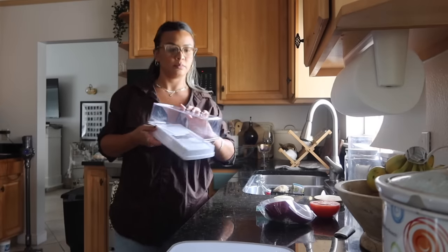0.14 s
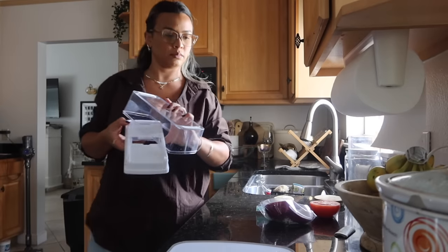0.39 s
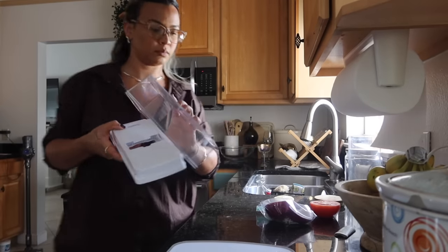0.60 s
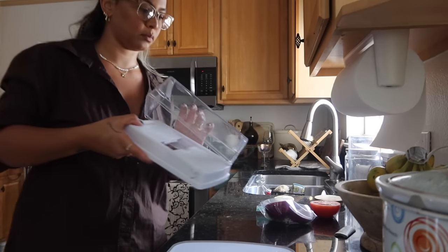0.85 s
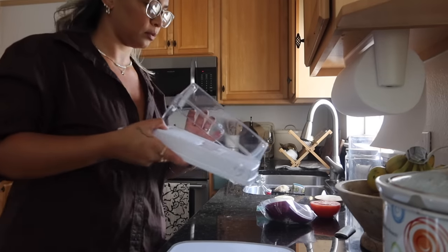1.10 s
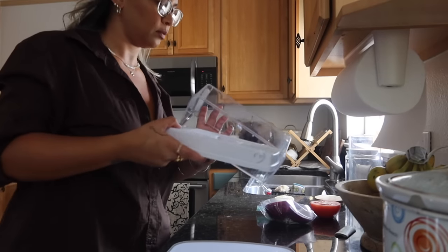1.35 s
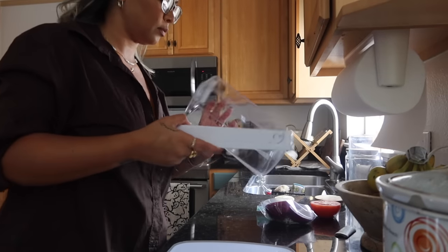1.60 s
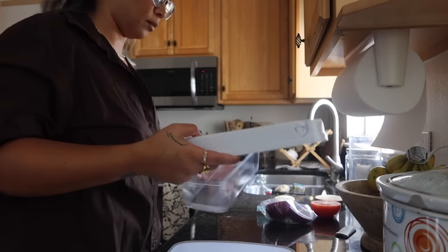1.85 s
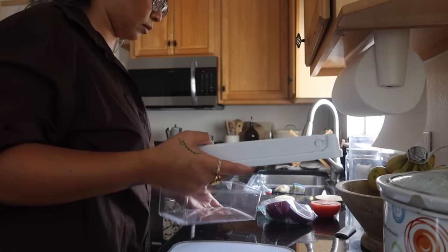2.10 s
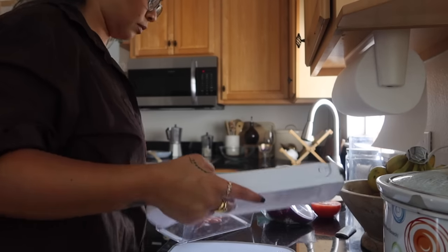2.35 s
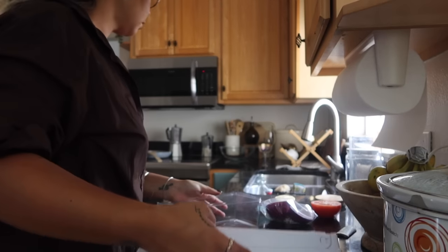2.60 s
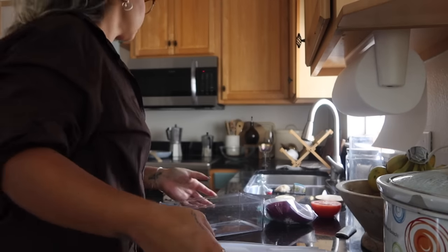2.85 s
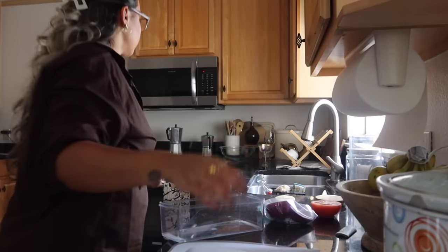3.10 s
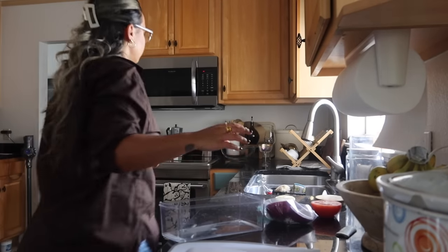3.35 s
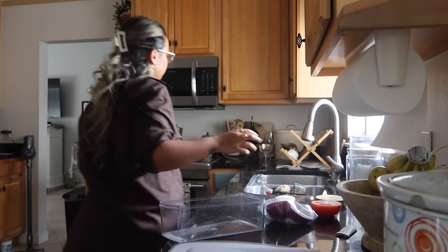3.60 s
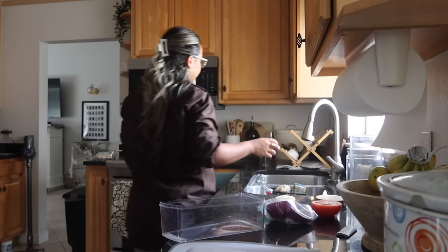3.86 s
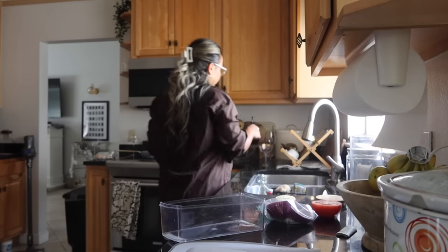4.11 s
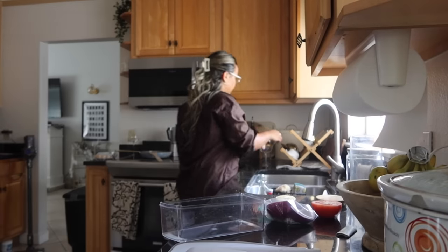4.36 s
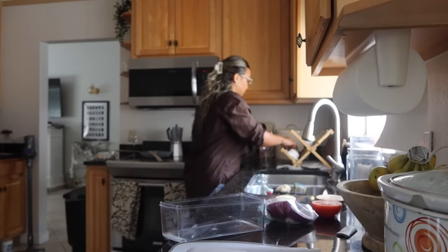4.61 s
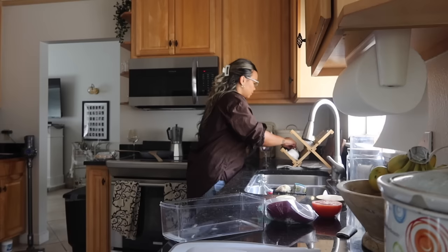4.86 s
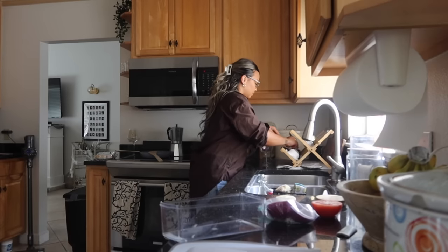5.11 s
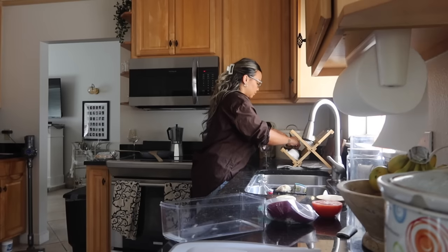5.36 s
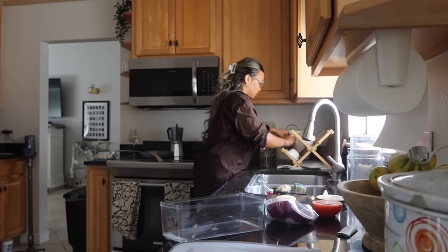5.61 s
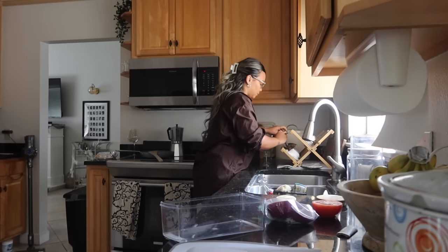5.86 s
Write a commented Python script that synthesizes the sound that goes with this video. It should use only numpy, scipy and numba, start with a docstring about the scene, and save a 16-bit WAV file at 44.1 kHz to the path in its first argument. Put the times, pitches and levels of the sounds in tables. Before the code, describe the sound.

A low, slightly wavering fridge hum and room air run throughout a hard, reflective kitchen. From 0.1 s, close to the microphone, a hollow rigid plastic box and lid bump in quick irregular knocks with soft hand rustle; a strong clack lands at 0.45 s, others around 0.65, 0.97, 1.54 and 1.7 s. After a lull, small dull lid bumps at 2.4 to 2.55 s lead to a sharp loud rap at 2.7 s and a lesser one at 2.8 s. At 3.1 s the box hits the stone counter, the loudest moment: a clipped double crack with short chatter to 3.3 s, its room tail swelling as the limiter releases. A tiny tick comes at 3.7 s. From 3.9 s cloth and hands rustle with faint wooden taps; farther off, a spoon, fork and cutlery jingle in a wooden rack at 5.0 to 5.3 s, then a plate clinks among brisk rack knocks at 5.6 to 5.8 s.

```python
"""Hands and sleeves rustle as a clear plastic box and its lid knock together and are set down on a stone counter
next to a camera, then a plate and cutlery clink in a wooden rack further off, over a fridge's hum.
Each knock is a short noisy chatter that rings an object's decaying modes, with a brief crack on top.
Rustle and air are shaped noise. Hard kitchen surfaces reflect it all; the camera's limiter pulls the loudest
knocks down, so their room tail swells as it lets go."""
import sys
import numpy as np
from scipy import signal
from scipy.fft import rfft, irfft
from scipy.io import wavfile
from scipy.ndimage import uniform_filter1d
from numba import njit

SR = 44100
rng = np.random.default_rng(int(sys.argv[2]) if len(sys.argv) > 2 else 0)


def field_ratio(decibels):
    """Amplitude ratio for a level in dB (20 dB per decade); scalars and array-likes work."""
    return 10 ** (np.asarray(decibels, dtype=float) / 20)


def generate_wav(sig):
    """Save sig (samples, or channels by samples) to the path in sys.argv[1] as 16-bit PCM at SR."""
    pcm = np.round(np.clip(np.atleast_2d(sig).T, -1, 1) * 32767).astype(np.int16)
    wavfile.write(sys.argv[1], SR, pcm)


N = 263277
T = np.arange(N) / SR


def colour(x, points, turn=1):
    """Shapes the spectrum along (Hz, dB) points; turn=1j also shifts every phase by a quarter cycle."""
    hz, db = np.transpose(points)
    f = np.fft.rfftfreq(x.shape[-1], 1 / SR) + 1
    gain = field_ratio(np.interp(np.log(f), np.log(hz), db))
    return irfft(rfft(x) * turn * gain, x.shape[-1])


def level(x, db):
    """Sets the rms."""
    return x * field_ratio(db) / np.sqrt(np.mean(x ** 2))


def walk(rate):
    """Smooth random drift with rms 1, from about `rate` fresh values per second."""
    k = int(SR / rate)
    steps = np.repeat(rng.standard_normal(N // k + 1), k)
    smooth = uniform_filter1d(uniform_filter1d(steps, k), k)
    return level(smooth[:N], 0)


def burst(shape):
    """Noise drawn in a given envelope, then given a flat spectrum and unit energy."""
    spectrum = rfft(rng.standard_normal(len(shape)) * shape)
    return irfft(spectrum / np.abs(spectrum))


def knocks(blows, modes, crack_hz, top_db, scatter_db):
    """Each blow is a short chatter that rings the modes, with a crack of dense brief modes.

    Each blow: start in seconds, ring level in dB, brightness in dB per octave, pitch in Hz under which
    modes are held still, chatter time scale in ms, crack level in dB against the ring."""
    hz, db, t60 = np.array(modes, float).T[:, :, None]
    out = np.zeros(N + SR)
    t = T[:SR // 2]
    # the contact is not infinitely hard
    soft = signal.butter(3, min(1.25 * hz.max(), 18000), fs=SR, output="sos")
    for start, ring_db, tilt, held_hz, chatter_ms, crack_db in blows:
        u = T[:4096] * 1000 / max(chatter_ms, 0.3)
        push = burst((u + 0.44) * np.exp(-2 * u))[:3072]

        # every blow wakes the modes unevenly
        chance = rng.standard_normal((2, len(modes), 1))
        gains = field_ratio(db + tilt * np.log2(hz / 1200) + scatter_db * chance[0])
        gains = gains / (1 + (held_hz / hz) ** 6)
        pitch = hz + 0.5 * chance[1] / t60  # the grip detunes damped modes most
        decay = np.exp(-np.log(1000) * t / t60)
        ring = np.sum(gains * np.sin(2 * np.pi * pitch * t) * decay, axis=0)
        ring = ring / np.sqrt(np.sum(gains ** 2))
        ring = signal.sosfilt(soft, signal.fftconvolve(ring, push)[:len(t)])

        slope = [(held_hz, 0), (crack_hz, tilt), (1.57 * crack_hz, tilt + 0.5 * top_db), (16000, tilt + top_db)]
        dense = colour(burst(np.exp(-T[:2048] / 0.0067)), slope)
        ring[:4096] += field_ratio(crack_db) * signal.fftconvolve(dense[:1536], push)[:4096]

        # small things radiate no bass
        no_bass = signal.butter(3, 1.015 * held_hz, "high", fs=SR, output="sos")
        k = int(start * SR)
        out[k:k + len(t)] += field_ratio(ring_db) * signal.sosfilt(no_bass, ring)
    return out[:N]


# Modes of the plastic box. Each row: pitch in Hz, relative level in dB, 60 dB decay in seconds.
BOX_MODES = [(354, -18, 0.098), (535.5, -11, 0.15), (600, -12.5, 0.14), (642, -4.5, 0.037),
             (759.3, 5.5, 0.074), (837, -4.5, 0.042), (1108, 5, 0.034), (1274, -5, 0.06),
             (2044, 12, 0.0067), (2230, -8, 0.062), (2424, 10, 0.014), (2694, 2, 0.055), (2850, 0.5, 0.013),
             (3350, -13, 0.075), (4100, -52, 0.007)]
# Blows on the box. Each row: start in seconds, ring level in dB, brightness in dB per octave,
# chatter time scale in ms, crack level in dB against the ring.
BOX_KNOCKS = [(.086, -13.5, -42, 4.3, 0), (0.099, -20.5, -12.5, 11, 2), (0.162, -23.5, 13.5, 10, 5),
              (.219, -24.5, -34.5, 6.8, -9), (.243, -19, -13, 5.3, -8), (.398, -15, -4.5, 8.3, 6),
              (.412, -16, -9, 24, 2), (.454, 9.5, 7.5, 4.5, -1), (.5, -4.5, -1, 29, 4),
              (.65, -15, -29, 7.9, -12), (0.947, -12.5, -5.5, 17, 0), (.971, 2, -1.5, 5.7, 16),
              (1.128, -18.5, -6, 21, -3), (1.524, -16, -2.5, 23, 15.5), (1.54, -12, -3, 5.7, -18),
              (1.681, -11, -6.5, 2.1, 12), (3.083, 15, -5.5, 6.2, 18.5), (3.142, 9.5, -7.5, 6.1, 21.5),
              (3.2, -8, -8, 31, 22), (3.25, -3, -7.5, 22, 20.5), (3.292, -4.5, -11, 21, -11),
              (3.7, -25.5, -10, 7.2, 15)]
# How the hands hold the box. Each row: time in seconds, pitch in Hz under which modes are held still.
GRIP_ON_BOX = [(.16, 915), (.22, 396), (.4, 600), (.454, 450), (.65, 455), (.948, 760), (.971, 290),
               (1.54, 500), (1.68, 950), (3.7, 972)]


def plastic_box():
    """Box walls ring in modes; the grip on them changes as the box is turned."""
    grip_s, grip_hz = np.transpose(GRIP_ON_BOX)
    blows = [(s, db, tilt, np.interp(s, grip_s, grip_hz), ms, crack_db)
             for s, db, tilt, ms, crack_db in BOX_KNOCKS]
    return knocks(blows, BOX_MODES, crack_hz=4070, top_db=-25.5, scatter_db=1.5)


# Modes of the plastic lid. Each row: pitch in Hz, relative level in dB, 60 dB decay in seconds.
LID_MODES = [(275, 7, 0.1), (496.6, -3, 0.31), (551, 5.5, 0.094), (756, 3.5, 0.13), (886, 0, 0.13),
             (935, 3, 0.053), (1152, 11, 0.019), (1220, 4.5, 0.057), (1343, 1.5, 0.059), (1570, -2.5, 0.03),
             (1746, 0, 0.033), (2095, -0.5, 0.028), (2590, -5.5, 0.027), (2880, -33, 0.024)]
# Blows on the lid. Each row: start in seconds, ring level in dB, chatter time scale in ms,
# crack level in dB against the ring.
LID_KNOCKS = [(2.345, -24.5, 2.1, -20), (2.408, -3, 1.5, -43), (2.549, -5, 2.2, -32.5),
              (2.558, -9, 5.3, -38), (2.695, 15, 0.915, 4.5), (2.828, 2, 10, 15)]


def plastic_lid():
    """The lid rings in modes, and harder blows are brighter."""
    tilt_per_db = 0.345  # dB per octave for each dB of ring
    blows = [(s, db, tilt_per_db * db, 420, ms, crack_db) for s, db, ms, crack_db in LID_KNOCKS]
    return knocks(blows, LID_MODES, crack_hz=3890, top_db=-44.5, scatter_db=1.5)


# Modes of the plate. Each row: pitch in Hz, relative level in dB, 60 dB decay in seconds.
PLATE_MODES = [(642, -15, 0.14), (1339, -5.5, 0.21), (2008, -8.5, 0.27), (1910, -3, 0.19),
               (2537, -2, 0.052), (2830, -13, 0.063), (2870, -1.5, 0.037), (3680, -3.5, 0.31),
               (3730, -6, 0.17), (4720, -22, 0.081), (5850, -17.5, 0.21), (7014, -21, 0.25),
               (8600, -30, .15), (10100, -37, 0.13)]
# Blows on the plate. Each row: start in seconds, ring level in dB, chatter time scale in ms.
PLATE_CLINKS = [(5.607, -8, 2.9), (5.74, -16, 4.7)]


def plate():
    """China rings in modes under a strong crack."""
    blows = [(s, db, 0, 600, ms, 12) for s, db, ms in PLATE_CLINKS]
    return knocks(blows, PLATE_MODES, crack_hz=3770, top_db=-44, scatter_db=0.5)


# Modes of the wooden rack. Each row: pitch in Hz, relative level in dB, 60 dB decay in seconds.
RACK_MODES = [(480, -12, .05), (720, -9, .02), (1100, -4, .02), (1660, 0, .025), (2100, -2, .015),
              (2700, -2, .015), (3350, -5, .012)]
# Blows on the rack. Each row: start in seconds, ring level in dB, brightness in dB per octave,
# chatter time scale in ms.
RACK_KNOCKS = [(4.063, -21, -39, 18), (4.211, -22, -5, 9.2), (4.887, -25.5, 8, 8), (5.045, -18, 2, 25),
               (5.153, -40, -7, 15), (5.25, -16.5, 2, 17), (5.265, -12, 1, 11.6), (5.539, -39, 10, 12),
               (5.62, -11, 5.5, 40), (5.718, -6.5, 8.5, 16), (5.728, -6, 0, 8), (5.757, -6, 11, 33),
               (5.785, -8, 4, 25)]


def wooden_rack():
    """Wood rings in short modes that each blow wakes very unevenly."""
    blows = [(s, db, tilt, 650, ms, 9.5) for s, db, tilt, ms in RACK_KNOCKS]
    return knocks(blows, RACK_MODES, crack_hz=3960, top_db=-21.5, scatter_db=2.5)


STEEL_CHATTER_MS = 2.3
# Modes of the spoon. Each row: pitch in Hz, relative level in dB, 60 dB decay in seconds.
SPOON_MODES = [(2950, -10, 0.18), (2950, 5, 0.32), (4830, 2, 0.06), (7820, -6, 0.13), (9590, -11, 0.11),
               (11400, -10, 0.25), (11500, -23, .06), (13660, -12, 0.27)]
# Blows on the spoon. Each row: start in seconds, ring level in dB, pitch in Hz under which fingers hold the modes.
SPOON_CLINKS = [(5.002, -41, 6000), (5.041, -24.5, 1980), (5.152, -41, 9000), (5.72, -33.5, 9000)]


def spoon():
    """Steel rings in high modes; the fingers hold the low ones still."""
    blows = [(s, db, 0, held_hz, STEEL_CHATTER_MS, -8) for s, db, held_hz in SPOON_CLINKS]
    return knocks(blows, SPOON_MODES, crack_hz=10000, top_db=-7, scatter_db=0.5)


# Modes of the fork. Each row: pitch in Hz, relative level in dB, 60 dB decay in seconds.
FORK_MODES = [(6200, -8, 0.054), (8350, -7, 0.082), (9830, -4, 0.045), (10400, -12, .08),
              (11500, -12, 0.077), (12660, -19.5, .08), (14090, -12, .08)]
# Blows on the fork. Each row: start in seconds, ring level in dB.
FORK_CLINKS = [(3.922, -55), (4.359, -47.5), (5.245, -30.5), (5.538, -41), (5.78, -33.5)]


def fork():
    """Steel rings in short high modes; those under 5530 Hz are held still."""
    blows = [(s, db, 0, 5530, STEEL_CHATTER_MS, -3) for s, db in FORK_CLINKS]
    return knocks(blows, FORK_MODES, crack_hz=10000, top_db=-19, scatter_db=0.5)


# Modes of the other pieces in the rack. Each row: pitch in Hz, relative level in dB, 60 dB decay in seconds.
CUTLERY_MODES = [(3200, 12, 0.079), (3170, -20, .05), (4360, -3, .05), (5330, -7, .06), (6170, -6, 0.058),
                 (7100, -5, 0.053), (8940, -6, 0.083), (10600, -6, 0.053), (12000, -8, .07),
                 (13100, -6, .06)]
# Rattling spells. Each row: start in seconds, end in seconds, ring level in dB of the strongest possible tap.
RATTLES = [(4.999, 5.308, -41), (5.53, 5.588, -40), (5.72, 5.824, -25)]


def cutlery_jingle():
    """Small taps among the cutlery at chance times, each up to 12 dB weaker than the strongest."""
    taps_per_s = 70
    out = 0
    for start, end, db in RATTLES:
        when, weakness = rng.random((int(taps_per_s * (end - start)), 2)).T
        taps = [(start + (end - start) * w, db - 12 * z, 0, 2500, STEEL_CHATTER_MS, -3)
                for w, z in zip(when, weakness)]
        out = out + knocks(taps, CUTLERY_MODES, crack_hz=10000, top_db=-18, scatter_db=4)
    return out


# Movement of hands and sleeves. Each row: time in seconds, level in dB, treble lift in dB.
RUSTLE_MOVES = [(0.0, -40, -2.5), (.4, -45, -1), (.8, -45, -17), (1.2, -41, -8), (1.33, -49.5, 1),
                (1.6, -53.5, 1), (1.9, -64, -3), (2.33, -49, -1), (2.5, -63, -9), (3.79, -56, -3),
                (3.864, -43, 6.5), (3.91, -58, 12), (3.93, -49, 15), (3.991, -53, 8), (4.091, -46, 16.5),
                (4.22, -34.5, 1.5), (4.33, -48.5, -10), (4.369, -42, 1.5), (4.61, -42.5, 8),
                (4.92, -39.5, -2.5), (5.03, -37, -1), (5.272, -28.5, 3), (5.49, -45.5, -18.5),
                (5.57, -33.5, 6.5), (5.65, -38.5, -11.5)]
# Spectrum of cloth and skin. Each row: frequency in Hz, relative density in dB per Hz.
CLOTH_SPECTRUM = [(180, -40.5), (300, -17.5), (474, -14.5), (669, -8.5), (1020, -11), (1210, -8),
                  (1370, -7), (3170, -9.5), (15000, -47)]


def rustle():
    """Cloth and skin sliding: noise in quick uneven grains; the treble moves on its own."""
    grains = rng.standard_normal(N) * field_ratio(1.2 * walk(300))
    noise = level(colour(grains, CLOTH_SPECTRUM), 0) * field_ratio(1.94 * walk(25))
    treble = signal.sosfilt(signal.butter(2, 2800, "high", fs=SR, output="sos"), noise)
    s, db, treble_db = np.transpose(RUSTLE_MOVES)
    lift = field_ratio(np.interp(T, s, treble_db)) - 1
    return field_ratio(np.interp(T, s, db)) * (noise + treble * lift)


# Spectrum of the air of the house. Each row: frequency in Hz, relative density in dB per Hz.
AIR_SPECTRUM = [(12, -103), (20, -48.5), (42, -9), (116, -8.5), (239, -10), (260, -10.5), (395, -9.5),
                (480, -11.5), (583, -13.5), (793, -18.5), (1350, -21), (1550, -20), (15600, -55.5)]
# Motor tones of the fridge. Each row: frequency in Hz, level in dB, bandwidth in Hz.
MOTOR_TONES = [(61.4, -55, 5.4), (116.8, -44.5, 15.6), (238.6, -51, 19)]


def fridge():
    """Wavering motor tones, noise through narrow resonances, over the air of the house, as mid and side."""
    air = level(colour(rng.standard_normal((2, N)), AIR_SPECTRUM), -42)
    air = air * field_ratio(0.6 * walk(3))
    for hz, db, width in MOTOR_TONES:
        resonance = signal.iirpeak(hz, hz / width, fs=SR)
        air[0] += level(signal.lfilter(*resonance, rng.standard_normal(N)), db)
    return air


# Bands of the kitchen's reflections. Each row: centre in Hz, 60 dB decay in seconds, level in dB.
ROOM_BANDS = [(150, 0.89, 2), (500, 0.63, -3), (1280, 0.89, -3.5), (2655, 0.83, -9), (5130, 0.83, -4),
              (9000, 0.37, -7), (15000, 0.38, -24.5)]


def kitchen(x):
    """Dense reflections that build up in a few ms and die band by band; unrelated for mid and side."""
    t = T[:SR]
    centres = np.log(np.array(ROOM_BANDS)[:, 0])
    f = np.log(np.fft.rfftfreq(SR, 1 / SR) + 1)
    tail = 0
    for (hz, t60, db), own in zip(ROOM_BANDS, np.eye(len(ROOM_BANDS))):
        share = np.sqrt(np.interp(f, centres, own))  # neighbouring bands cross at equal power
        band = irfft(rfft(rng.standard_normal((2, SR))) * share, SR)
        unit_energy = np.sqrt(2 * np.log(1000) / t60 / SR)
        tail = tail + field_ratio(db) * band * np.exp(-np.log(1000) * t / t60) * unit_energy
    build_up = np.clip((t - 0.004) / 0.0036, 0, 1)
    return signal.fftconvolve(x[None], tail * build_up, axes=1)[:, :N]


# Side colour of the two microphone ports. Each row: frequency in Hz, side against mid in dB before the trims in scene().
PORT_COLOUR = [(60, -21.5), (110, -24), (200, -12), (380, -15.5), (700, -20.5), (1290, -18), (2380, -16),
               (4400, -4), (8120, 1.5), (15000, 5.5)]


def scene():
    """Near knocks, far clinks with more room, rustle and hum, picked up through two close ports."""
    near = plastic_box() + plastic_lid()
    far = plate() + wooden_rack() + spoon() + fork() + cutlery_jingle()
    cloth = rustle()
    direct = near + far + cloth
    mid, side = kitchen(near + field_ratio(4.0) * far + field_ratio(-6) * cloth) + fridge()
    # the direct sound reaches one port a little earlier: side in quadrature
    direct_side = field_ratio(-4.0) * colour(direct, PORT_COLOUR, turn=1j)
    side = field_ratio(1.5) * colour(side, PORT_COLOUR) + direct_side
    return np.array([mid + direct + side, mid + direct - side])


@njit
def follow(x, attack, release):
    """Peak follower; attack and release are the share of the gap closed per sample."""
    e, out = 1e-6, np.empty(len(x))
    for i in range(len(x)):
        e += (x[i] - e) * (attack if x[i] > e else release)
        out[i] = e
    return out


def roll_off(x):
    """The treble ends steeply here."""
    return signal.sosfilt(signal.butter(12, 15800, fs=SR, output="sos"), x)


# Response of the microphone. Each row: frequency in Hz, gain in dB.
MIC_RESPONSE = [(100, 0.5), (13000, 0), (14500, -1), (16000, -18)]


def record(dry):
    """A quick limiter and a slower one duck after loud knocks; the first cycles slip through and clip."""
    peak = np.max(np.abs(dry), axis=0)
    # time constants in seconds: attack, release
    quick = follow(peak, 1 / (0.00036 * SR), 1 / (0.075 * SR))
    slow = follow(peak, 1 / (0.13 * SR), 1 / (0.35 * SR))
    quick_gain = np.minimum(1, field_ratio(-0.5) / quick) ** 0.68
    slow_gain = np.minimum(1, field_ratio(-22.5) / slow) ** 0.29
    limited = colour(dry * quick_gain * slow_gain, MIC_RESPONSE)
    return roll_off(np.clip(limited, -1, 1))


dry = scene()
out = record(dry)
generate_wav(out)
```